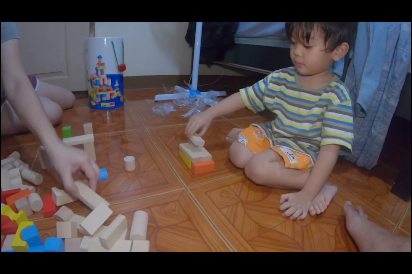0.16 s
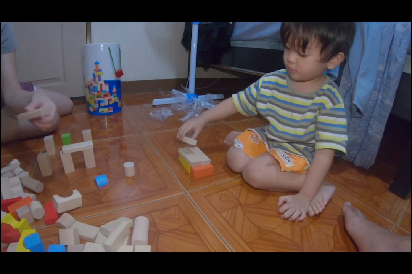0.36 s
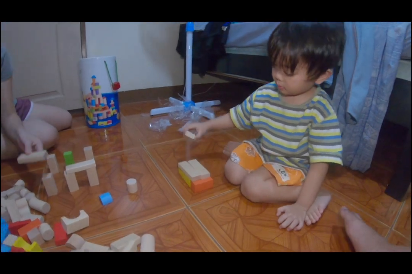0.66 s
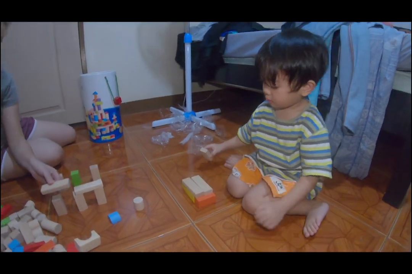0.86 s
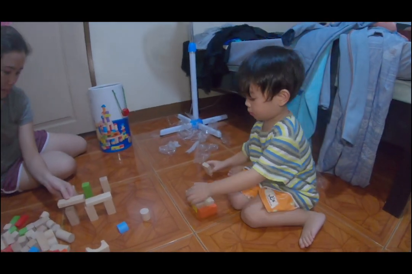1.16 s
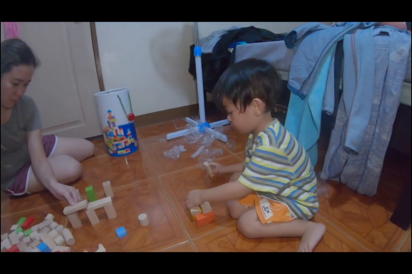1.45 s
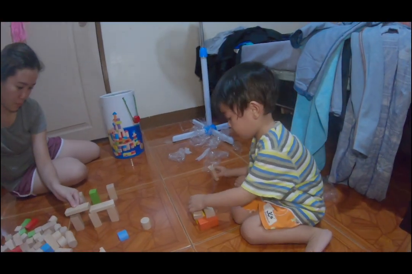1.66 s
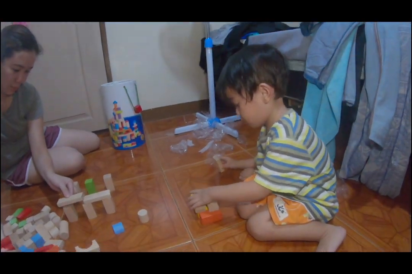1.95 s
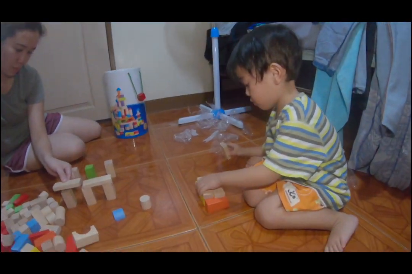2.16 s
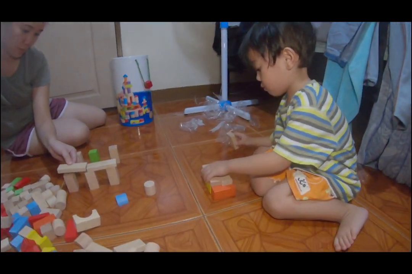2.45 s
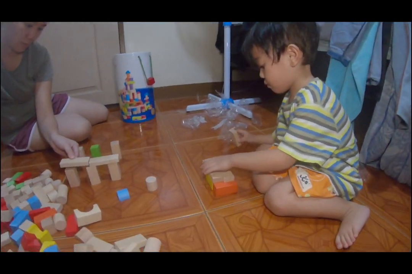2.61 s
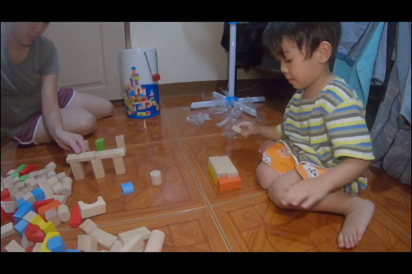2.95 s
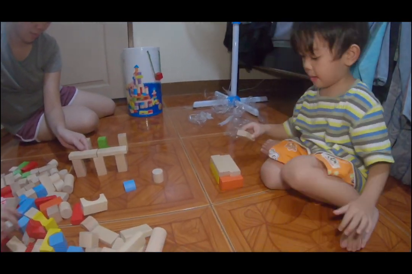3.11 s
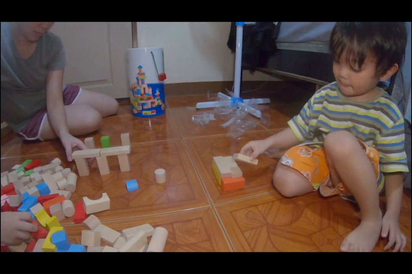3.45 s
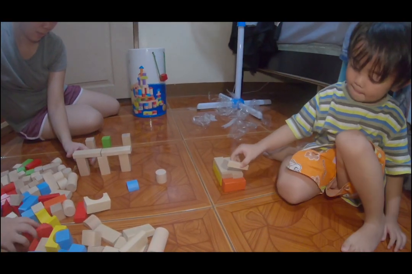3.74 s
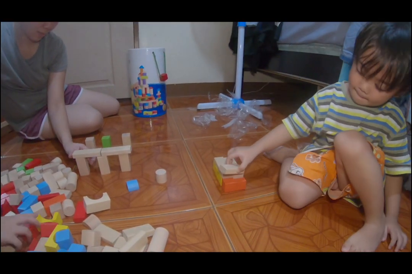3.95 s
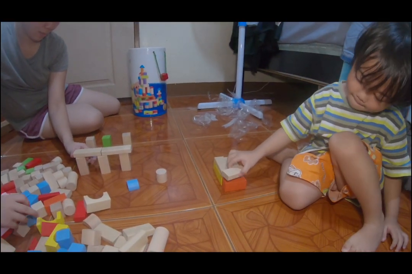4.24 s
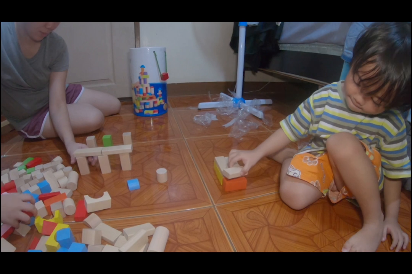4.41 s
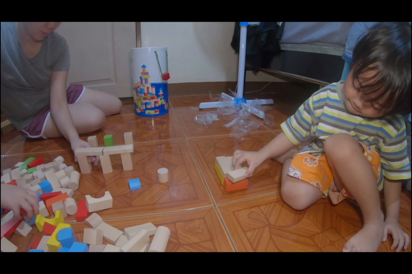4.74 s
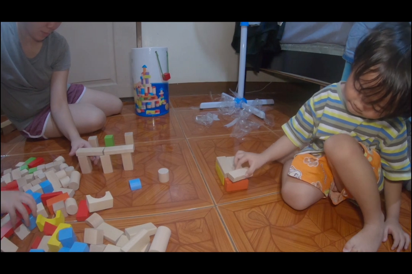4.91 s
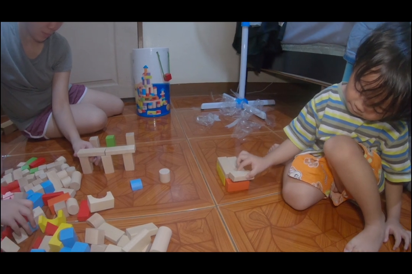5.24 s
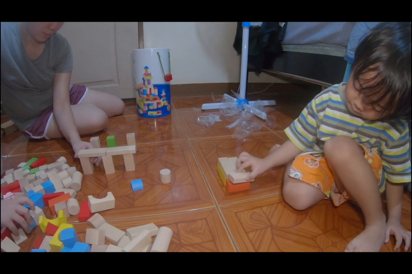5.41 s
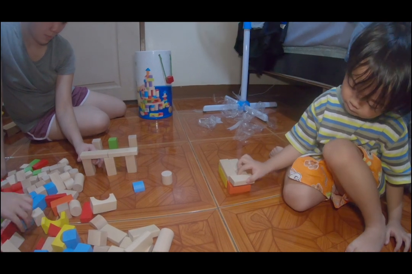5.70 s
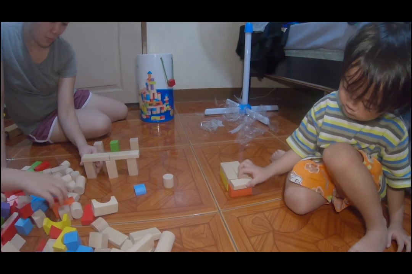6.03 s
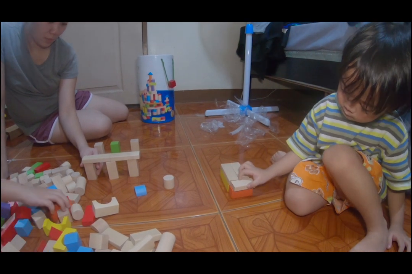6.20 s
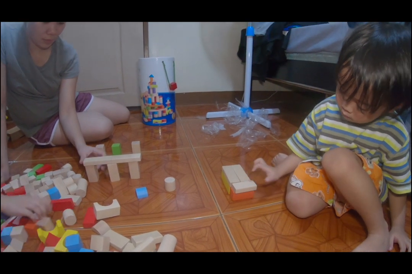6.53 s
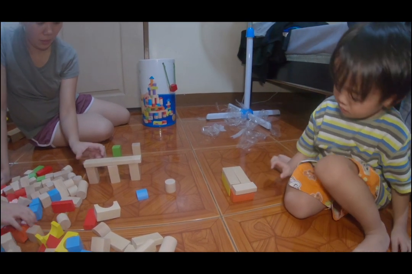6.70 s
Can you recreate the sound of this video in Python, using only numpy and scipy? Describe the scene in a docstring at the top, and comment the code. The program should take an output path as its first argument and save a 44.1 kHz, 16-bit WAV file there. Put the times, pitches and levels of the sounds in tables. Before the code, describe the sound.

Scattered clicks and one louder clatter of wooden blocks being picked up and stacked, with low microphone handling rumble and a soft hum.

```python
"""Wooden blocks on a tiled floor

Toy blocks are picked from a heap, dropped and stacked in a small, hard room; one handful tumbles.
Each impact excites the modes of a block, giving a short clack that reflections prolong.
An appliance hums, and the moving hand-held camera rumbles. The faint sounds dip once in level."""
import sys
import numpy as np
from scipy import signal
from scipy.fft import rfft, irfft, next_fast_len
from scipy.io import wavfile
from scipy.ndimage import uniform_filter1d, minimum_filter1d, map_coordinates

SR = 44100
rng = np.random.default_rng(int(sys.argv[2]) if len(sys.argv) > 2 else 0)


def unload_wav(signal):
    """Save mono or channel-first audio to the path in sys.argv[1] as 16-bit WAV at rate SR, clipped to [-1, 1]."""
    wavfile.write(
        sys.argv[1],
        SR,
        np.round(np.clip(np.atleast_2d(signal).T, -1, 1) * 32767).astype(np.int16),
    )


N = 302524
TIME = np.arange(N) / SR


def amp(db):
    """Amplitude ratio of a level in decibels."""
    return 10 ** (np.asarray(db) / 20)


def along(points, hz):
    """Interpolation of (f/Hz, value) points on a logarithmic frequency axis."""
    f, values = np.transpose(points)
    return np.interp(np.log(hz + 1), np.log(f + 1), values)


def wobble(rate):
    """Smooth random modulation: a spline through rate knots a second."""
    return map_coordinates(rng.standard_normal(int(N * rate / SR) + 4), [TIME * rate])


def swell(t, start, end, rise_s, fall_s):
    """Envelope with exponential growth until start, unity until end, then exponential decay."""
    return np.exp(np.minimum(t - start, 0) / rise_s - np.maximum(t - end, 0) / fall_s)


def filtered(x, response):
    """Linear filtering: the spectrum of x is multiplied by a frequency response."""
    size = next_fast_len(N + SR // 2)
    return irfft(rfft(x, size) * response(np.fft.rfftfreq(size, 1 / SR)), size)[:N]


def noise(spectrum):
    """Spectral shaping of white noise, at unit rms."""
    return unit(filtered(rng.standard_normal(N), lambda hz: amp(along(spectrum, hz))))


def unit(x):
    """Normalisation to unit rms."""
    return x / np.sqrt(np.mean(x ** 2) + 1e-20)


def even_noise(spectrum, size=2200):
    """Coloured noise, steadied by division by its running rms."""
    x = noise(spectrum)
    power = np.abs(uniform_filter1d(uniform_filter1d(x ** 2, size), size))
    return x / np.sqrt(power + 0.0036)


def minimum_phase(gain):
    """The most compact causal pulse with this magnitude spectrum."""
    cepstrum = irfft(np.log(np.maximum(gain, 1e-6)))
    half = len(cepstrum) // 2
    cepstrum[1:half] *= 2
    cepstrum[half + 1:] = 0
    return irfft(np.exp(rfft(cepstrum)))


def add(track, s, sound):
    """Superposition of a sound on the track at time s."""
    start = max(0, round(s * SR))
    part = track[start:start + len(sound)]
    part += sound[:len(part)]


def dip(t, start_s=1.36, fall_s=0.19, hold_s=0.7, recover_s=0.54, depth_db=-8):
    """Brief attenuation of the faint sounds: a quick fall and a slow recovery."""
    corners = start_s + np.cumsum([0, fall_s, hold_s, recover_s])
    return amp(np.interp(t, corners, [0, depth_db, depth_db, 0]))


# partials of the appliance: f/Hz, level/dB
HUM_PARTIALS = [(57.6, -44.5), (60, -63.5), (116, -58.5), (177, -66), (359, -56.5), (403.5, -63.5),
                (518, -68), (689, -66), (747, -64), (1437, -78), (1497, -66.5)]
# spectrum of the hiss: f/Hz, level/dB
HISS_SPECTRUM = [(40, 2.5), (200, 3), (300, -4.5), (420, 0.5), (750, 1), (1100, -5), (1650, -4),
                 (2500, -14.5), (4300, -10), (5500, -19.5), (9000, -20.5), (13000, -30.5), (16000, -33)]

def appliance_hum(hiss_db=-52, waver_rad=0.33, flutter_db=-0.13):
    """Partials with slight random amplitude and phase modulation sound over broadband hiss."""
    hum = np.zeros(N)
    for hz, db in HUM_PARTIALS:
        peak = np.sqrt(2) * amp(db + flutter_db * wobble(20))
        hum += peak * np.sin(2 * np.pi * hz * TIME + waver_rad * wobble(30))
    return dip(TIME) * (hum + amp(hiss_db) * noise(HISS_SPECTRUM))


# spectra of moving air and of the grip on the case: f/Hz, level/dB
RUMBLE_SPECTRUM = [(5, -6), (14, 5), (25, -5.5), (40, -11), (75, -28.5), (120, -38.5), (300, -72),
                   (1000, -130)]
GRIP_SPECTRUM = [(25, 15), (50, -26), (80, 17.5), (120, 2.5), (200, -2.5), (300, -15.5), (500, -26),
                 (1000, -77), (3000, -110)]
# jolts of the camera: t/s, duration/s, air level/dB, grip level/dB
CAMERA_JOLTS = [(0.795, 0.04, -12, -54), (1.218, 0.077, -3, -21), (1.4, 0.03, -15.5, -26.5),
                (1.532, 0.011, -16.5, -30), (1.817, 0.07, -9.5, -32), (2.013, 0.041, -16, -46.5),
                (2.17, 0.0099, -27, -43), (2.31, 0.033, -31, -45.5), (2.41, 0.015, -54, -39),
                (3.464, 0.059, -16, -39.5), (4.484, 0.029, -19, -49.5), (5.77, 0.019, -47, -40),
                (6.245, 0.036, -11.5, -30), (6.39, 0.025, -15, -32.5), (6.546, 0.14, -17.5, -44.5)]

def camera_handling(rumble_db=0.5, bump_db=3, sway_db=-21, held_db=-34, ceiling=0.55):
    """Airborne and structure-borne noise: jolts sway the air at the microphone and bump the case."""
    air, grip = np.full(N, amp(held_db)), np.zeros(N)
    for s, length, air_db, grip_db in CAMERA_JOLTS:
        air += amp(air_db) * swell(TIME, s, s + length, rise_s=0.025, fall_s=0.06)
        grip += amp(grip_db) * swell(TIME, s, s + length, rise_s=0.0088, fall_s=0.037)
    rumble = amp(rumble_db) * air * even_noise(RUMBLE_SPECTRUM) + amp(sway_db) * wobble(17)
    bumps = amp(bump_db) * grip * even_noise(GRIP_SPECTRUM, size=500)
    return ceiling * np.tanh(rumble / ceiling) + bumps


def resonance(hz, centre_hz, q):
    """Power response of one mode; its bandwidth narrows as the quality factor q rises."""
    return 1 / (1 + (2 * q * (hz / centre_hz - 1)) ** 2) ** 1.5


# spectrum of struck wood: f/Hz, level/dB
WOOD_SPECTRUM = [(100, -48.5), (300, -16), (550, -10), (850, -2.5), (1250, 3), (1800, 1.5), (2400, 2),
                 (4300, 6), (5200, -5.5), (6200, -10.5), (8000, -9.5), (10000, -21.5), (12000, -21.5),
                 (16000, -45.5)]
# hollow modes of wood lying on tile: f/Hz, level/dB
HOLLOW_MODES = [(856, 4.5), (1054, -0.5), (1218, -2.5), (1738, 3.5), (2631, -1)]

def block_impact(knock_db, edge_db, ring_hz, body_db, clink_db=13, knock_hz=2200, edge_hz=5100):
    """Impact excitation: a heavy contact knocks, a sharp corner adds treble, one mode stands out."""
    hz = np.fft.rfftfreq(2048, 1 / SR)
    # a softer contact lasts longer, so its treble falls more steeply
    db_per_octave = 0.65 * min(edge_db + 3, 0)
    dull_db = db_per_octave * np.log2(np.maximum(hz / edge_hz, 1))
    # a long block's mode lies within the clack; a short block's clinks above it
    ring = amp(body_db if ring_hz < edge_hz else clink_db) ** 2 * resonance(hz, ring_hz, q=24)
    # modal strengths vary with the point of contact
    hollow = sum(amp(db + rng.normal(0, 3)) ** 2 * resonance(hz, f, q=16) for f, db in HOLLOW_MODES)
    power = amp(along(WOOD_SPECTRUM, hz) + dull_db) ** 2 * (1 + ring + hollow)
    # three bands share unit energy
    low = 1 / (1 + (hz / knock_hz) ** 10)
    high = 1 - 1 / (1 + (hz / edge_hz) ** 28)
    bands = power * np.array([low, (1 - low) * (1 - high), high])
    bands /= bands.mean(axis=1, keepdims=True)
    shares = amp([knock_db, 0, edge_db]) ** 2
    return minimum_phase(np.sqrt(shares / shares.sum() @ bands))


# reverberation time, shorter in the treble, which clothes and bedding absorb: f/Hz, T60/s
ROOM_T60 = [(300, 0.34), (1200, 0.32), (4000, 0.32), (7000, 0.31), (13000, 0.27)]
# initial spectrum of the reverberant tail: f/Hz, level/dB
TAIL_SPECTRUM = [(500, -1.5), (1500, 1), (4000, 2), (8000, -0.1), (14000, 1.36)]

def room_response(chatter_db, chatter_t60, walls_db, tail_db, build_s=0.007, reflections=8):
    """Multipath propagation: direct sound, chatter on the tile, early reflections, diffuse tail."""
    hz, frame_s, spectra = signal.stft(rng.standard_normal(16384), SR, nperseg=256)
    fade_db = along(TAIL_SPECTRUM, hz)[:, None] - 60 * frame_s / along(ROOM_T60, hz)[:, None]
    tail = signal.istft(spectra * amp(fade_db), SR, nperseg=256)[1]
    t = np.arange(len(tail)) / SR
    tail *= 1 - np.exp(-t / build_s)
    chatter = rng.standard_normal(len(t)) * amp(-60 * t / chatter_t60)
    delays = (rng.uniform(0.002, 0.022, reflections) * SR).astype(int)
    walls = np.bincount(delays, rng.standard_normal(reflections), len(t))
    layers = [(0, t == 0), (chatter_db, chatter), (walls_db, walls), (tail_db, tail)]
    return sum(amp(db) * x / np.sqrt(np.sum(x ** 2)) for db, x in layers)


# dominant mode of each block, longest block first: name -> f/Hz
BLOCK_MODES = {"board": 1757, "plank": 2650, "beam": 3670, "bar": 3900, "brick": 4210, "tile": 4450, "stub":
               6820, "cube": 8060, "dowel": 10216, "peg": 11200, "chip": 12100}
# contacts in picking, tumbling, stacking and rummaging: t/s, level/dB, knock level/dB,
# edge level/dB (both re the middle band), block, first flight/s (0 = held fast)
CONTACTS = [ (0.0032, -11.5, -6, -14, "peg", 0.0045), (0.149, -18, -1, -5, "stub", 0.00089),
            (0.241, -21, 14, -25, "plank", 0), (0.3341, -10, -7.5, -18, "brick", 0.00034),
            (0.368, 1, -5, -15.5, "cube", 0.06), (0.4977, -8, 4, -9, "stub", 0.00084),
            (0.5823, -13, 15, -26, "beam", 0.0019), (0.6401, -4, -2, -10.5, "peg", 0.0047),
            (0.7452, -16.5, 11, -12, "tile", 0.00021), (0.8316, -12, 6.5, -20, "beam", 0.017),
            (0.938, -15, 2.5, -13, "beam", 0.00056), (1.0445, -14, 8, -13, "beam", 0.001),
            (1.2197, -10, 7.5, -11, "brick", 0.0061), (1.2644, 3, -1, -13.5, "cube", 0.0012),
            (1.7353, -2.5, -3, -19, "board", 0.0079), (2.1366, -0.5, -2.5, -8.5, "cube", 0.046),
            (2.767, -7.5, -3, -13, "plank", 0.024), (2.9012, -14, -1, -23, "brick", 0.00015),
            (2.963, -3.5, 3, -14, "plank", 0.00021), (2.9861, 0.5, -1, -8, "bar", 0),
            (3.0048, 4.5, -5.5, -11.5, "brick", 0.0017), (3.0271, 7, 11, -6, "stub", 0.0013),
            (3.0383, 9.5, -12, -12.5, "stub", 0.0011), (3.0413, 12.5, -13, 9, "stub", 0.00015),
            (3.064, 3, 4, -7, "stub", 0), (3.0775, 2.5, -5, -17, "stub", 0.0176),
            (3.112, 1, -11, 3, "bar", 0.00071), (3.1167, 7, -5, -6, "bar", 0.0011),
            (3.1268, 7.5, -6, 0.5, "stub", 0.02), (3.2387, 1, 0.5, -12.5, "peg", 0.02),
            (3.2648, -2, 0.5, -9, "stub", 0.00037), (3.3428, -7, -14, -8, "cube", 0),
            (3.599, -9, 9, -12, "brick", 0.0021), (3.6829, -9, -2, -10, "tile", 0.0061),
            (3.7006, 0.5, -6.5, -15, "bar", 0.0078), (3.8766, -13.5, -4, -19.5, "brick", 0.00082),
            (4.1393, -15, -6, -22, "beam", 0.0018), (4.387, -18, -9, -24, "beam", 0.00013),
            (4.425, -17, 8, -23, "beam", 0.0046), (4.6189, -7.5, -3, -1, "chip", 0),
            (4.89, -19.5, -4, -37, "plank", 0.0029), (5.1372, -13.5, 8, -19, "beam", 0.0015),
            (5.312, 7, 3.5, -18.5, "dowel", 0.041), (5.552, -19, 4.5, -16.5, "beam", 0.00061),
            (5.847, -4.5, 10, -15, "tile", 0.00069), (5.861, 1, 4, -19.5, "tile", 0.002),
            (5.919, 4.5, -2.5, -14, "tile", 0.014), (6.1541, -16.5, -6, -25, "beam", 0.00081),
            (6.237, -11, -10, -13.5, "stub", 0.022), (6.3059, -1, 0.5, -15, "chip", 0.00071),
            (6.375, -3.5, 5, -12, "tile", 0.021), (6.4178, 9, -4, -2, "tile", 0.0037),
            (6.5897, -3, 2.5, -14.5, "plank", 0.021), (6.637, -3.5, 6.5, -15.5, "beam", 0),
            (6.8055, 3.5, -7, -8.5, "beam", 0)]

def clacks(level_db=-3.5, flight_ratio=0.55, bounce_loss_db=6.5, tumble_s=(2.95, 3.35), nearer_db=2):
    """Inelastic collision: blocks strike wood and tile; loose ones rebound, ever sooner and softer."""
    track = np.zeros(N)
    for s, db, knock_db, edge_db, name, flight_s in CONTACTS:
        body_db = 5 + 0.35 * max(-db, 0)  # a light tap lets the mode stand out more
        # the handful tumbles nearer the microphone, so its direct sound is stronger
        near_db = nearer_db * (tumble_s[0] < s < tumble_s[1])
        for bounce in range(3 if flight_s > 0 else 1):
            room = room_response(chatter_db=0.8, chatter_t60=0.021,
                                 walls_db=-7 - near_db, tail_db=0.17 - near_db)
            impact = block_impact(knock_db, edge_db, BLOCK_MODES[name], body_db)
            gain = amp(db + near_db + level_db - bounce_loss_db * bounce)
            add(track, s + 0.0008, gain * signal.fftconvolve(impact, room))
            s += flight_s * flight_ratio ** bounce
    return track


# spells of jostling: start t/s, end t/s, level/dB
JOSTLE_SPELLS = [(0, 0.278, -21.5), (0.368, 0.48, -23), (0.843, 1.023, -22.5), (2.726, 2.835, -21),
                 (3.049, 3.145, -5.5), (3.58, 3.905, -22), (4.983, 5.198, -19), (5.861, 5.993, -14.5),
                 (6.266, 6.418, -8.5), (6.45, 6.758, -17)]

def jostling(level_db=-3, spread_db=4, resting_db=-33.5, fade_s=0.025, count=150):
    """Random light impacts excite blocks of any size as fingers search the heap or a handful settles."""
    track = np.zeros(N)
    times = (np.arange(count) + rng.random(count)) * N / SR / count
    spells = sum(amp(db) * swell(times, start, end, fade_s, fade_s) for start, end, db in JOSTLE_SPELLS)
    gains = (amp(resting_db) + spells) * dip(times)
    for s, gain, (force, weight, pitch) in zip(times, gains, rng.standard_normal((count, 3))):
        touch = block_impact(knock_db=5.5 + 3.3 * weight, edge_db=-12.5,
                             ring_hz=3900 * np.exp(0.15 * pitch), body_db=6.5)
        room = room_response(chatter_db=0, chatter_t60=0.02, walls_db=-8, tail_db=-3)
        strength = amp(level_db + spread_db * np.tanh(force))
        add(track, s, gain * strength * signal.fftconvolve(touch, room))
    return track


# spectrum of the struck floor: f/Hz, level/dB
FLOOR_SPECTRUM = [(100, -14.5), (260, -4.5), (450, 4.5), (750, 10), (1200, -5.5), (3000, -52)]
# landings of the tumbling handful: t/s, level/dB
FLOOR_HITS = [(3.027, -5.5), (3.064, -15.5), (3.077, -16.5), (3.117, -9.5)]

def floor_thuds(level_db=-3):
    """Impulse response of the floor: falling blocks excite a dull thud that reverberates in the room."""
    track = np.zeros(N)
    hz = np.fft.rfftfreq(2048, 1 / SR)
    thud = minimum_phase(unit(amp(along(FLOOR_SPECTRUM, hz))))
    for s, db in FLOOR_HITS:
        room = room_response(chatter_db=-28, chatter_t60=0.081, walls_db=1, tail_db=6)
        add(track, s, amp(db + level_db) * signal.fftconvolve(thud, room))
    return track


def scene():
    """Superposition of all sources at one microphone."""
    return (clacks() + floor_thuds() + jostling() + camera_handling() + appliance_hum())[None]


def record(dry):
    """Peak limiting and band limiting: the camera turns down the highest peaks and cuts the top treble."""
    ceiling, top_hz = 0.94, 16100
    needed = np.minimum(1, ceiling / (np.abs(dry[0]) + 1e-9))
    gain = uniform_filter1d(minimum_filter1d(needed, size=129), size=129)
    return filtered(dry[0] * gain, lambda hz: hz < top_hz)[None]


dry = scene()
out = record(dry)
unload_wav(out)
```